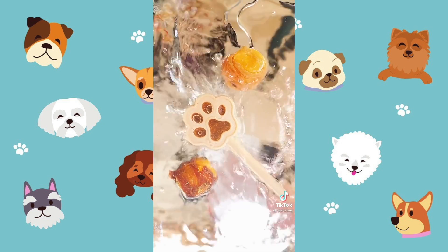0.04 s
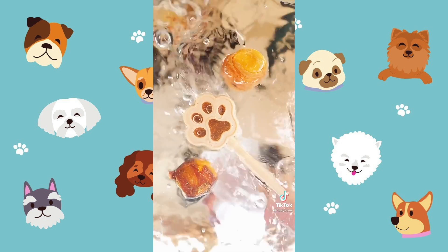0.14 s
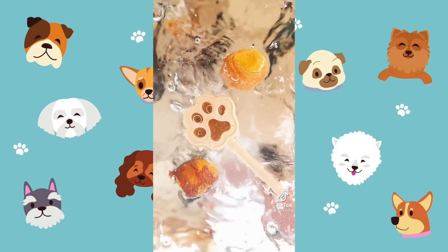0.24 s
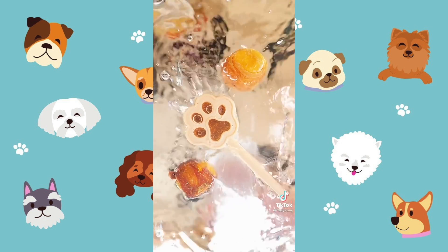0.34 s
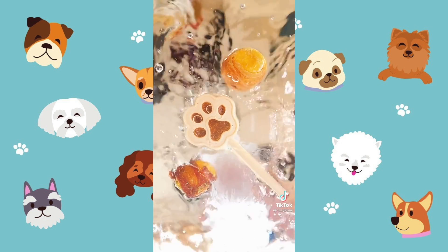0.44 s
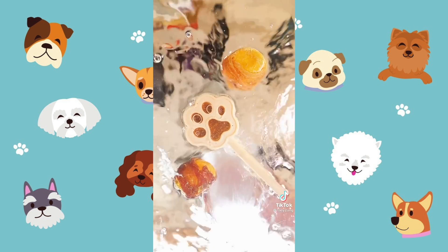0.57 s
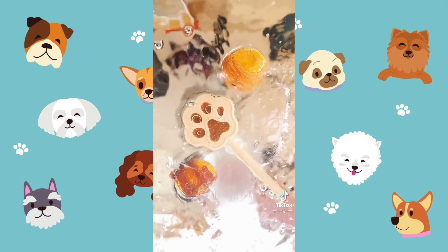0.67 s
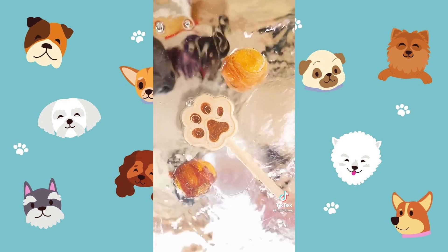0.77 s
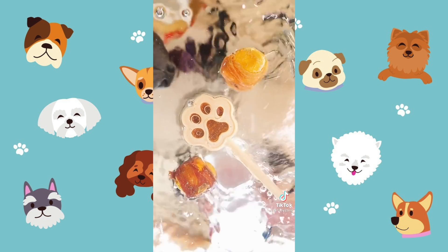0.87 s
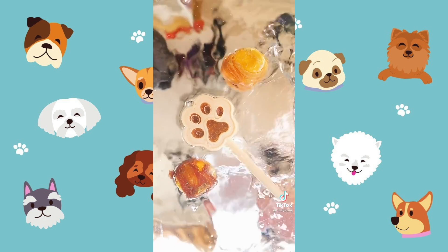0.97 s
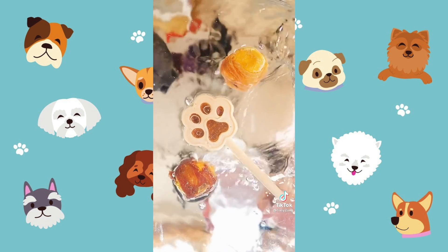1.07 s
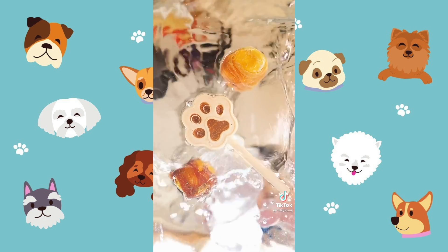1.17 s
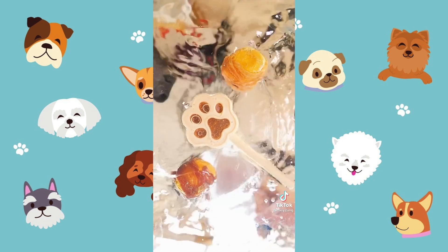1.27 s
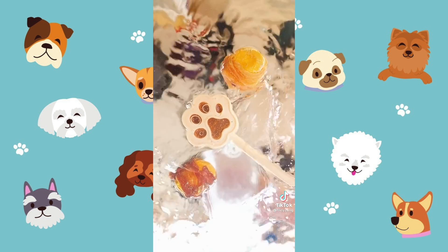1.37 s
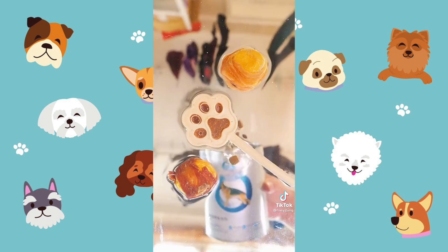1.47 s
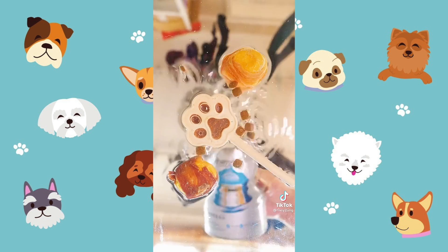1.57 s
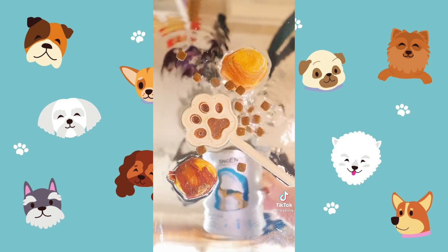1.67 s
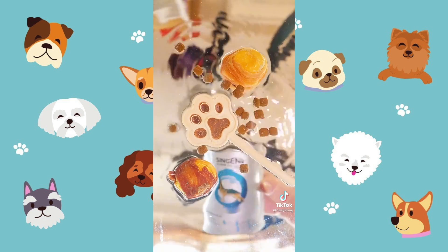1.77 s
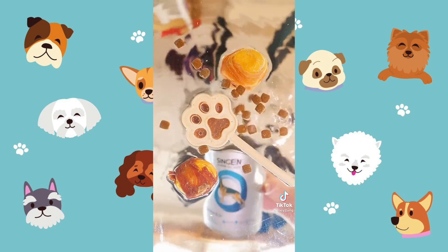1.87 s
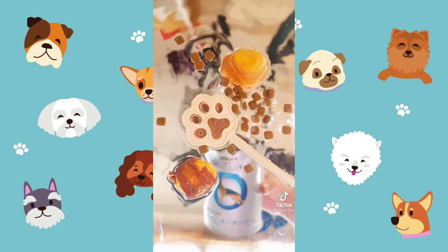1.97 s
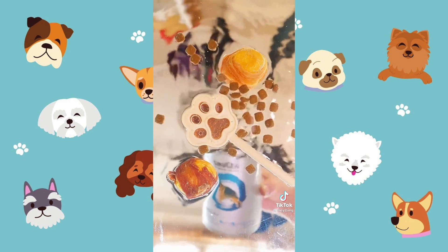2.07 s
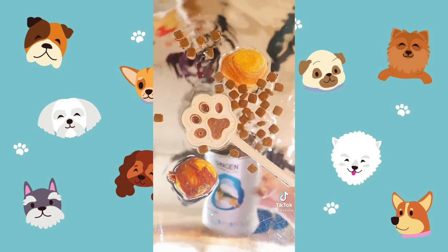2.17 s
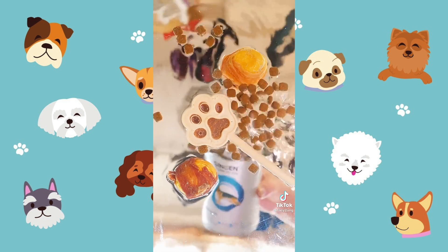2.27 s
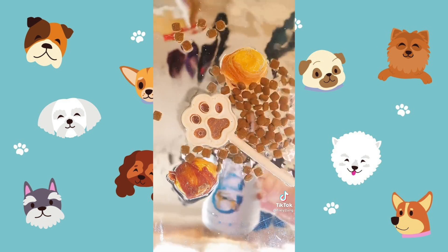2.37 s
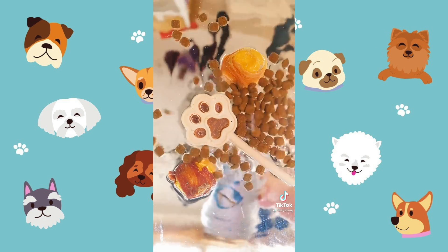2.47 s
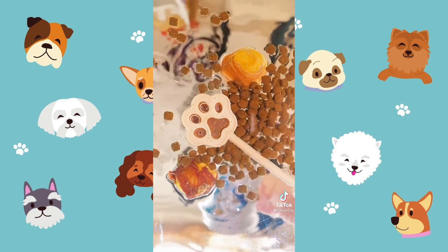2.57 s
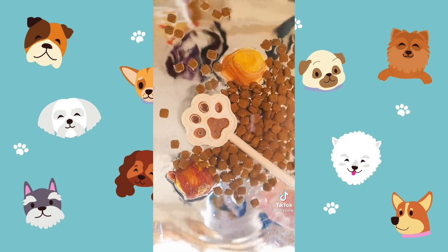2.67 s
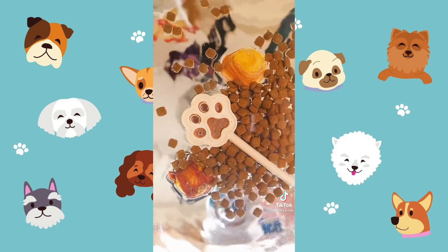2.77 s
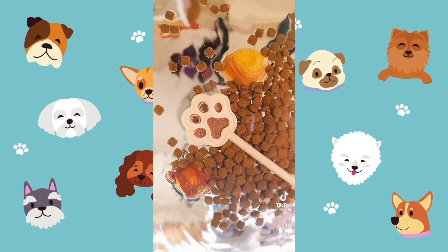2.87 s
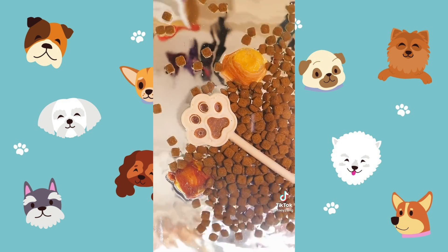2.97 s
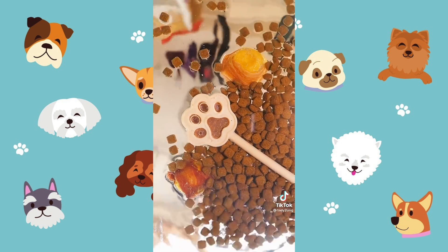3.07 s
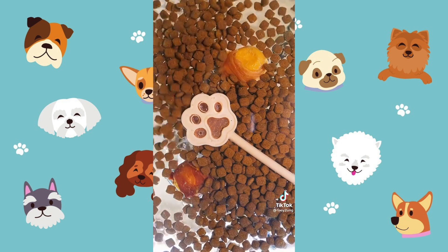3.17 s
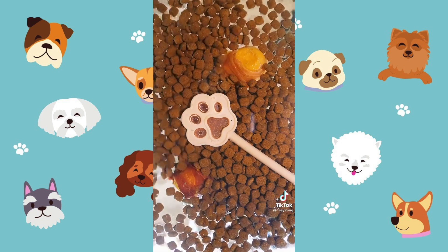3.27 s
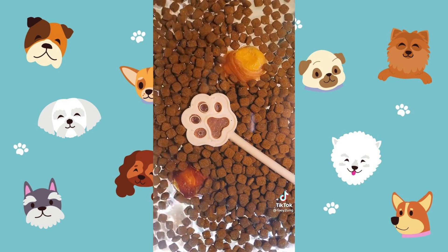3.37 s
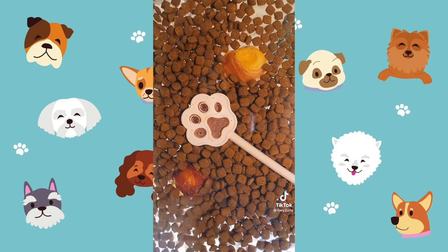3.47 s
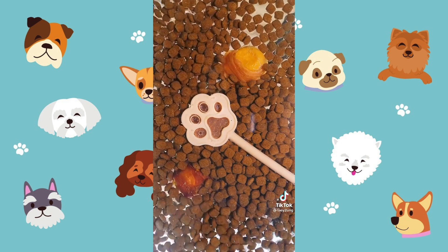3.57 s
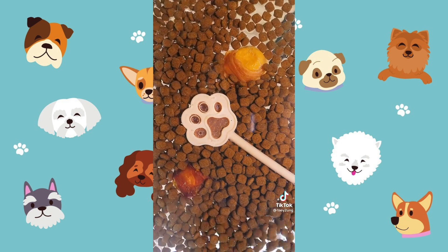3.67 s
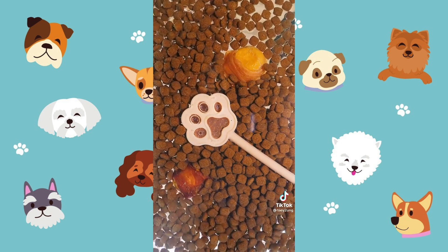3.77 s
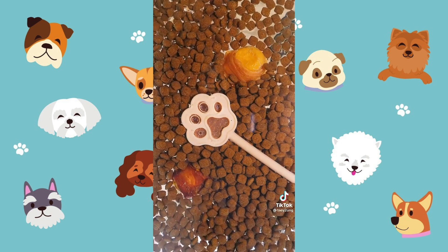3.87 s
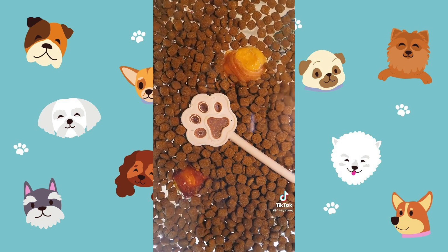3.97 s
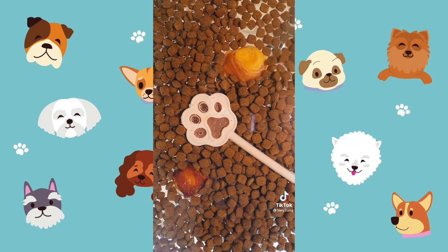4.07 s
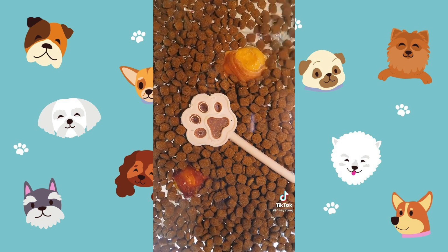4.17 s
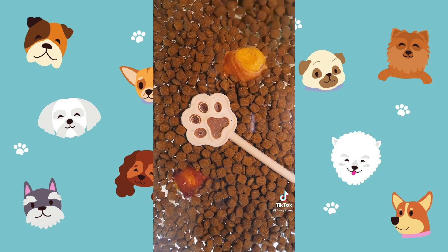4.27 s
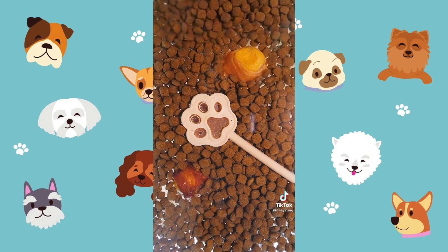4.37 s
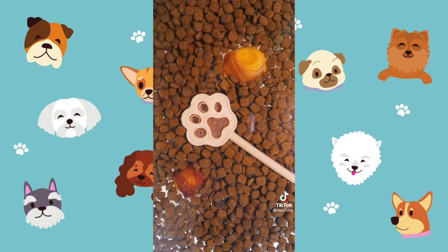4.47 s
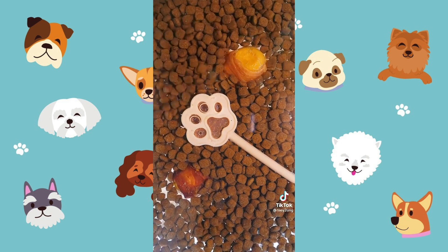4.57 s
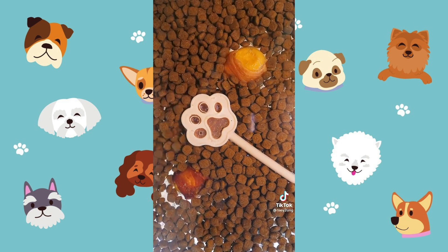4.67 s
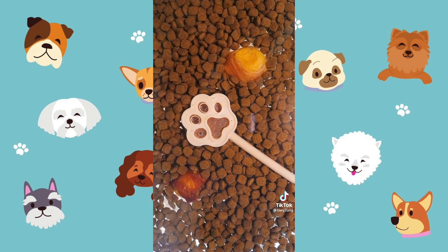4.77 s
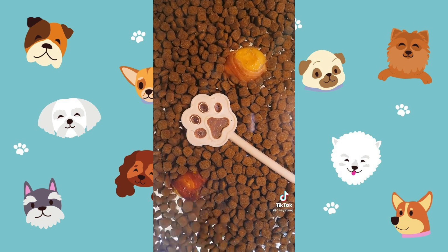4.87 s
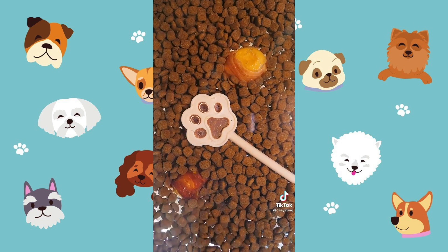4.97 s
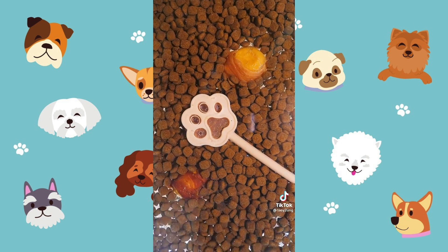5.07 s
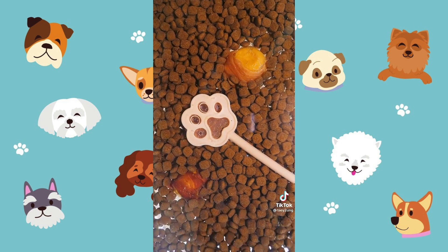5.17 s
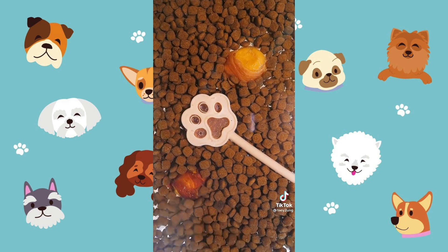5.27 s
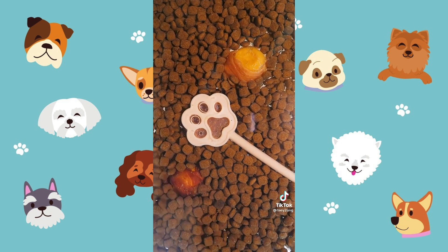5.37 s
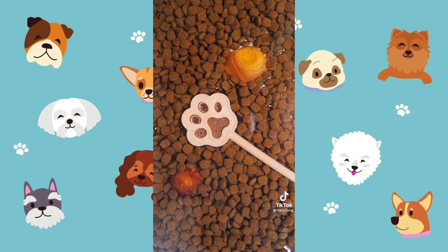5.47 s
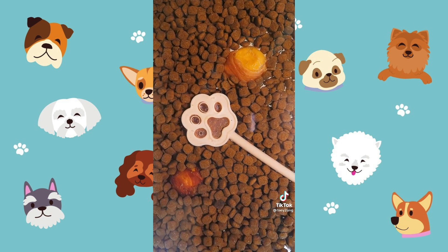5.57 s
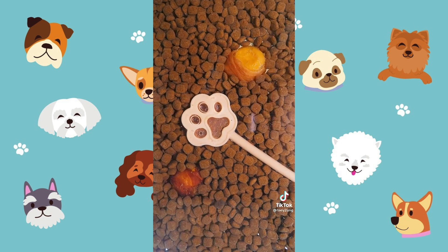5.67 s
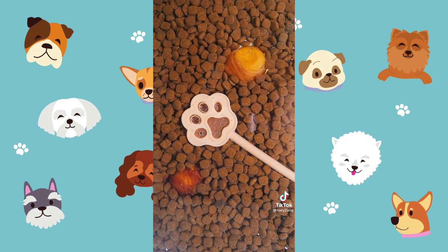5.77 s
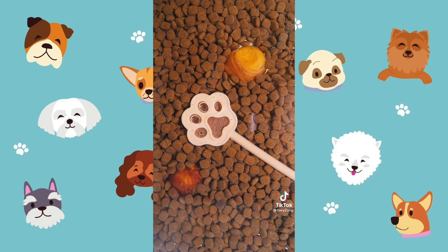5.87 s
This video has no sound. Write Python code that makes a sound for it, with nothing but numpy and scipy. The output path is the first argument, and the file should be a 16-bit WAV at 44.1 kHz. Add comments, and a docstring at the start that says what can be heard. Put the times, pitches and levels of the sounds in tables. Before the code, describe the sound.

A close, nearly mono microphone catches bright, brittle crackling of plastic sheet with a thin ring and soft hand bumps. Hard little pellets start hitting the floor of a plastic container, and the trickle opens into a steady clattering stream. It becomes drier and weaker as the box fills, swelling twice in sliding rushes. It stops suddenly, with slight crinkling over quiet air and a faint low hum.

```python
"""Crackling film and poured kibble

Thin plastic film, pulled taut, crackles close by: many short clicks that also make the sheet ring.
Then dry kibble drops into a clear plastic box: clicks and scrapes of pellets, with the walls ringing.
Single pellets knock on the bare floor, the pour thickens, and the growing heap muffles the walls.
Two late surges slide in with a hollow rumble; the pour is cut off, leaving a faint crinkle, a few
snaps and soft bumps, and a low hum in the quiet air."""
import sys
import numpy as np
from scipy import signal
from scipy.fft import rfft, irfft, next_fast_len
from scipy.io import wavfile
from scipy.ndimage import uniform_filter1d

SR = 44100
rng = np.random.default_rng(int(sys.argv[2]) if len(sys.argv) > 2 else 0)


def generate_wav(sig):
    """Save sig (samples, or channels by samples) to the path in sys.argv[1] as 16-bit PCM at SR."""
    pcm = np.round(np.clip(np.atleast_2d(sig).T, -1, 1) * 32767).astype(np.int16)
    wavfile.write(sys.argv[1], SR, pcm)


N = 261513  # length of the scene in samples

# All levels in the tables are relative: each layer is also scaled where it is mixed.
# quiet room noise, level at each frequency: (frequency [Hz], level [dB])
AIR_SPECTRUM = [(15, -36), (25, -14), (213, 0), (1120, -3.5), (1310, -2.5), (1960, -4), (2240, -9.5),
                (2630, -11.5), (3090, -21), (4870, -5), (7090, -21.5), (10600, -12), (15000, -8)]
# low rumble of the room: (frequency [Hz], level [dB])
LOW_AIR_SPECTRUM = [(20, -5), (35, -4), (50, -2.5), (80, -5), (135, 0.5), (200, -6.5), (300, -3.0),
                    (1000, -13.5), (4000, -81)]
# steady tones of the low hum after the pour: (frequency [Hz], level [dB])
HUM_TONES = [(70.0, -58), (113.0, -64), (156.1, -57.5)]
# the loudest creases of the film snapping: (time [s], level [dB], pitch [Hz])
SNAPS = [(0.029, -30, 3470), (0.0478, -12, 4410), (0.0797, -7.5, 5500), (0.0962, -18.5, 2010),
         (0.1665, -8, 3350), (0.1764, -11, 1815), (0.2059, -11, 2120), (0.2271, -17, 2260),
         (0.3127, -8, 4060), (0.3292, -8.5, 2940), (0.3393, -25, 2700), (0.3631, -11, 2740),
         (0.3892, -12, 5460), (0.412, -11, 9400), (0.4399, -4, 8360), (0.5013, -12, 3650),
         (0.5242, -10.5, 6200), (0.5342, -13.5, 3780), (0.5556, -2.5, 7100), (0.5781, -4, 7500),
         (0.606, -15, 2280), (0.6154, -10.5, 3800), (0.6604, -16, 3900), (0.6679, -10, 3970),
         (0.7048, -12, 4200), (0.7138, -15, 3020), (0.745, -8.5, 3450), (0.7572, -5, 3620),
         (0.7966, -4.5, 3690), (0.821, -15, 3780), (0.833, -10, 3620), (0.8619, -9.5, 3520),
         (0.8879, -9.5, 3600), (0.9248, -8, 3690), (0.9384, -14, 4700), (0.9542, -8, 2265),
         (0.9737, -9, 5120), (1.0301, -4.5, 5090), (1.0434, -14, 4850), (1.067, -10.5, 7100),
         (1.0954, -16.5, 2280), (1.1523, -4, 3610), (1.1737, -7, 3580), (1.2226, -4.5, 2980),
         (1.2334, -10, 2990), (1.2506, -3.5, 2880), (1.279, -5.5, 2240), (1.2857, -10, 2890),
         (1.2994, -7.5, 3540), (1.3178, -12, 7350), (1.3773, -16, 2570), (1.4401, -10.5, 6550),
         (5.7304, -14.5, 4770), (5.7656, -16, 4830), (5.7838, -10, 4800), (5.8236, -17.5, 3700)]
# ways the stretched film rings: (frequency [Hz], width [Hz], level [dB])
FILM_MODES = [(1308, 38, -4), (1870, 90, -38), (2255, 120, 1.5), (2460, 200, -21), (2830, 69, -16),
              (3675, 54, 1), (5210, 100, 0.5), (6200, 170, -2.5), (7450, 300, -1)]
# pulls on the film, each with a fine crinkle: (start [s], length [s], level [dB], pitch [Hz])
PULLS = [(0.0, 0.083, -30, 2580), (0.142, 0.074, -31.5, 2300), (0.285, 0.1, -35.5, 2930),
         (0.574, .28, -38.5, 3780), (0.884, 0.26, -34, 2670), (1.148, 0.15, -31.5, 3190),
         (5.79, 0.16, -41, 3240)]
# soft bumps of the hand on the box: (time [s], level [dB], pitch [Hz])
BUMPS = [(0.167, -21, 585), (0.176, -24.5, 840), (0.201, -22, 1040), (0.407, -31, 620), (0.73, -20, 616),
         (0.79, -28.5, 606), (5.716, -34, 930), (5.742, -32, 1020), (5.761, -29, 900), (5.822, -24.5, 920)]
# strength of the stream of kibble: (time [s], level [dB])
FLOW = [(2.3, -22.5), (2.44, -21.5), (2.84, -21.5), (3.12, -27), (3.4, -26.5), (3.53, -26), (3.77, -31),
        (3.88, -34.5), (4.06, -33), (4.23, -29.5), (4.44, -27), (4.77, -30.5), (5.03, -30.5), (5.17, -34),
        (5.36, -26.5), (5.48, -31.5), (5.63, -31)]
# share of the stream that drums on the walls: (time [s], level [dB])
WALL_SHARE = [(2.3, -5), (2.95, -5.5), (3.25, 2), (3.5, -9), (4.35, -10.5), (4.7, -3), (5.1, -8.5),
              (5.6, -2.5)]
# the heap slides and shakes the loaded box: (crest [s], rumble [dB], rise [s], fall [s])
SURGES = [(4.272, -27, 0.28, 0.13), (5.298, -20, 0.14, 0.12)]
# moments when the stream falters: time [s]
STALLS = [1.83, 2.07, 3.942, 3.993, 4.975, 5.056]
# tone colour of pellets rattling on each other: (frequency [Hz], level [dB])
RATTLE_SPECTRUM = [(300, -40), (1000, -1.5), (2000, -6), (3000, -3), (5000, 1.5), (7000, 0.5), (10000, 5),
                   (15000, 12)]
# tone colour of pellets sliding: (frequency [Hz], level [dB])
SLIDE_SPECTRUM = [(1500, -33), (4000, -20.5), (8000, -2.5), (11000, -2), (13000, -1.5), (16000, 5)]
# ways the box rings: (frequency [Hz], width [Hz], level [dB])
BOX_MODES = [(487, 44, -19.5), (689, 91, -8), (785, 350, -14), (1272.5, 42, -9.5), (1336.7, 15, -6),
             (1811, 65, -5.5), (2154, 58, -20.5), (2160, 70, 1), (2986, 79, -1), (3486, 44, -5.5),
             (3786, 39, -4.5), (4820, 84, 2), (4980, 400, -1.5), (5200, 66, -34), (5750, 91, -4),
             (7230, 67, -12.5), (8030, 390, -7.5)]
# ways the floor rings until pellets cover it: (frequency [Hz], width [Hz], level [dB])
BARE_FLOOR_MODES = [(2998, 31, 1.5), (5010, 90, -7), (5450, 120, -2), (6120, 200, -2)]
# ways the walls ring when damped by the load: (frequency [Hz], width [Hz], level [dB])
HALF_FULL_MODES = [(686, 215, -11), (1319, 60, -6), (2084, 130, -2), (2990, 95, -3.5), (3750, 340, -5.5),
                   (4690, 160, -4.5), (6020, 470, -5)]
# low ways the filled box rings: (frequency [Hz], width [Hz], level [dB])
LOADED_MODES = [(483, 72, 3.5), (502, 83, -0.5), (577, 31, 2.5), (680, 540, -10.5)]
# pellets landing hard: (time [s], click [dB], knock on the box [dB])
LANDINGS = [(1.488, -3.5, -18), (1.5022, -3, -17.5), (1.5392, -3.5, -14), (1.5544, -8, -20.5),
            (1.5749, -1.5, -20.5), (1.5954, -2.5, -16.5), (1.6332, -14.5, -25), (1.6418, -12.5, -21.5),
            (1.6614, -4.5, -16.5), (1.6952, -2.5, -17), (1.7064, -9, -31), (1.73, -5.5, -24.5),
            (1.7439, -4, -23), (1.7596, -4, -20), (1.769, -2, -21), (1.796, -13, -46), (1.8538, -12.5, -19),
            (1.872, -21, -35.5), (1.9084, -9, -26), (1.9144, -2.5, -33.5), (1.947, -7, -19.5),
            (1.966, -6.5, -20.5), (1.981, -3.5, -27.5), (1.9884, -6, -26.5), (2.0164, -14.5, -33),
            (2.0278, 0, -18.5), (2.0473, -10, -23.5), (2.0854, -6, -26), (2.1012, -4.5, -18.5),
            (2.1117, -3.5, -21), (2.1293, -4.5, -21.5), (2.1535, -1.5, -21), (2.1584, -3.5, -15),
            (2.1792, -7.5, -20), (2.204, -2.5, -16.5), (2.2444, -4.5, -18), (2.2787, -3, -16.5),
            (2.3087, -2.5, -19.5), (2.3556, -3, -23), (2.4238, -2, -20.5), (2.4698, -3, -20),
            (2.7488, -3, -21), (2.8934, -4, -19.5), (2.9053, 0.5, -17.5), (3.3254, -6.5, -17.5),
            (3.3764, -7, -23), (3.4453, -7, -23.5)]
# pellets clicking on the heap: (time [s], level [dB], pitch [Hz])
TICKS = [(3.8616, -10, 5540), (3.8826, -13, 5530), (3.9054, -5.5, 5400), (3.9653, -1, 5600),
         (4.0276, 1, 10550), (4.0644, -5, 4550), (4.0978, -4.5, 4800), (4.115, -3, 5460), (4.129, -6, 6070),
         (4.154, -1, 3500), (4.2028, -18, 6200), (4.2607, -11, 4773), (4.6418, -2, 6300),
         (4.7867, -5, 4960), (4.8129, -0.5, 6250), (4.8227, 0, 5750), (4.8493, -5, 5990),
         (4.9851, -12, 11800), (5.007, -16, 4270), (5.0744, -11, 4300), (5.1733, -2.5, 10400),
         (5.2056, -8.5, 2970), (5.3892, -2.5, 9700), (5.4056, -7, 5800), (5.461, -8.5, 4030),
         (5.5508, -8, 3990)]
# how long the room's echo takes to fade by 60 dB: (frequency [Hz], time [s])
ROOM_FADE = [(200, 0.91), (2000, 0.22), (12000, 0.014)]
# the microphone's loss of treble: (frequency [Hz], level [dB])
MIC_TREBLE = [(9000, -0.5), (12000, -3.0), (14000, -9.0), (16000, -20.0)]

POUR_START, POUR_END = 1.485, 5.644  # s
TOP_HZ = 15900  # highest pitch of a click, and band limit of the microphone
PULL_ATTACK_S, PULL_RELEASE_DB_PER_S = 0.011, 244  # a pull takes hold, then lets go
SLACK_DB = -47.5  # effort between pulls
TAUT_START, TAUT_END = 0.64, 1.5  # s, the film is fully stretched
TRICKLE_DB, OPEN_S, OPEN_RISE_S = -21.5, 2.299, 0.15  # only a trickle falls until the stream opens up
STALL_S, STALL_DB = 0.016, -21.5  # width to each side and depth of a stall
SLIDE_LAG_S, SLIDE_RISE_S, SLIDE_FALL_S = 0.04, 0.12, 0.13  # the slide crests just after the rumble
HISS_DB = -8.5  # hiss against the flow
SURGE_HISS_DB, SURGE_RATTLE_DB = 12.5, 5.5  # gains in a surge
CLATTER_S, CLATTER_WIDTH_S, CLATTER_DB = 3.45, 0.11, 5  # harder clatter as the walls become covered
LOADED_S, LOADED_DB = 3.85, -11.5  # start of the box's rumble, and its level against the flow
PELLET_HZ = 5070  # pitch of a square hit
GLANCE_OCT_PER_DB = 0.11  # rise in pitch as the hit glances
SQUARE_HIT_DB = 13  # click over knock in a square hit


def amp(db):
    """Turn decibels into a gain."""
    return 10 ** (np.asarray(db) / 20)


def unit(x):
    """Scale to an average strength (rms) of 1."""
    return x / np.sqrt(np.mean(x ** 2) + 1e-20)


def even(x, size=3500):
    """Level out the strength over short stretches to about 1, keeping the single grains."""
    power = uniform_filter1d(uniform_filter1d(unit(x) ** 2, size), size)
    return unit(x) / np.sqrt(np.abs(power) + 1e-4)


def along(points, hz):
    """Read a curve of (frequency, value) points on a log frequency axis."""
    f, v = np.transpose(points)
    return np.interp(np.log(hz + 1), np.log(f + 1), v)


def gains(rows):
    """Give one gain per sample for each dB column after the time."""
    s, *columns = np.transpose(rows)
    return [amp(np.interp(np.arange(N) / SR, s, column)) for column in columns]


def during(start, end):
    """Give 1 between two times, with short ramps."""
    t = np.arange(N) / SR
    return uniform_filter1d(((t >= start) & (t < end)) * 1., size=100)


def swell(s, rise_s, fall_s):
    """A smooth hump from 0 to 1 and back, with its crest at s."""
    t = np.arange(N) / SR - s
    return np.exp(-(t / np.where(t < 0, rise_s, fall_s)) ** 2)


def filtered(x, response):
    """Scale each frequency of x by the given response."""
    m = next_fast_len(N + 8192)  # spare room, so the end does not wrap round to the start
    return irfft(rfft(x, m) * response(np.fft.rfftfreq(m, 1 / SR)), m)[..., :N]


def coloured(x, spectrum):
    """Pass x through a curve of (frequency, dB) points."""
    return filtered(x, lambda hz: amp(along(spectrum, hz)))


def add(track, s, sound):
    """Mix a sound into the track at a time."""
    part = track[max(round(s * SR), 0):][:len(sound)]
    part += sound[:len(part)]


def ring(modes, times, sizes, vary_db=4.0):
    """Blows on a body: each lands elsewhere, so it meets each mode (way of ringing) at a new strength."""
    t, out = np.arange(SR // 8) / SR, np.zeros(N)
    at = np.clip(np.round(times * SR).astype(int), 0, N - 1)
    for hz, width_hz, db in modes:
        z = rng.standard_normal((len(at), 2))
        blows = np.bincount(at, sizes * np.sign(z[:, 0]) * amp(vary_db * z[:, 1]), N)
        build_up = 1 - np.exp(-t * hz / 2.0)  # a mode takes a cycle or two to build up
        fade = np.exp(-np.pi * width_hz * t)  # a wider mode fades faster
        mode = np.sin(2 * np.pi * hz * t) * fade * build_up
        out += signal.oaconvolve(blows, amp(db) * mode / np.linalg.norm(mode))[:N]
    return out


def click(hz, spread, t60, crack, crack_t60, rise=0.001, count=9):
    """A small stiff thing struck: a sharp crack and a few short modes around its pitch; peak 1."""
    t = np.arange(SR // 25) / SR
    z = rng.standard_normal((count, 3))
    place = np.linspace(-1, 1, count)
    offset = spread * place * (np.abs(place) + 0.31 + 0.24 * z[:, 0])
    pitch = np.minimum(hz * np.exp(offset), TOP_HZ)[:, None]
    weight = amp(-12 * np.abs(place) + 9.0 * z[:, 1]) * np.sign(z[:, 2])
    slow = np.sqrt(4000 / pitch)  # lower modes swell later and last longer
    fade = amp(-60 * t / (t60 * slow))
    build_up = 1 - np.exp(-t / (rise * slow))
    tone = weight @ (np.sin(2 * np.pi * pitch * t) * fade * build_up)
    noise = rng.standard_normal(len(t)) * amp(-60 * t / crack_t60)
    burst = signal.lfilter(*signal.butter(2, [3200, 13000], "band", fs=SR), noise)
    sound = tone / np.abs(tone).max() + crack * burst / np.abs(burst).max()
    return sound / np.abs(sound).max()


def contacts(start, end, count, spread_db):
    """Random times and sizes of many small contacts."""
    times = rng.uniform(start, end, count)
    return times, amp(spread_db * np.minimum(rng.standard_normal(count), 2))


def grains(times, sizes, hz, spread, cycles, size=300):
    """Each contact rings for a few cycles at its own pitch, scattered around hz."""
    z = rng.standard_normal((len(times), 2))
    ratio = np.exp(spread * z[:, :1])
    turns = np.minimum(np.reshape(hz, (-1, 1)) * ratio, SR / 2) * np.arange(size) / SR
    waves = np.sin(2 * np.pi * turns) * np.exp(-turns / cycles) * (1 - np.exp(-2 * turns))
    waves *= sizes[:, None] * np.sign(z[:, 1:]) * np.sqrt(ratio)
    at = (times * SR).astype(int)[:, None] + np.arange(size)
    return np.bincount(at.ravel(), waves.ravel(), N)[:N]


def air():
    """Quiet room noise, a little stronger before the pour, and a low hum after it."""
    t = np.arange(N) / SR
    before = during(0, POUR_START)
    hiss_level = amp(-46.5) + amp(-58.5) * before
    hiss = hiss_level * unit(coloured(rng.standard_normal(N), AIR_SPECTRUM))
    low_level = amp(-55.0) + amp(-66.0) * before
    low = low_level * unit(coloured(rng.standard_normal(N), LOW_AIR_SPECTRUM))
    hum = np.zeros(N)
    for hz, db in HUM_TONES:
        hum += amp(db) * np.sqrt(2) * np.sin(2 * np.pi * hz * t + rng.uniform(0, 2 * np.pi))
    return hiss + low + amp(3.5) * hum * during(POUR_END, N / SR)


def pulling():
    """How hard the film is worked: each pull takes hold, lasts and lets go."""
    t = np.arange(N) / SR
    effort = amp(SLACK_DB) * (during(0, POUR_START) + amp(-9.0) * during(POUR_END, N / SR))
    for s, length, db, _ in PULLS:
        hold = np.clip((t - s) / PULL_ATTACK_S, 0, 1)
        release_db = PULL_RELEASE_DB_PER_S * np.maximum(t - s - length, 0)
        effort = np.maximum(effort, hold * amp(db - release_db))
    return effort


def crinkle(count, spread_db, spread, cycles, octaves=0):
    """Tiny creases give way; their pitch moves with the tension of the film, finer ones octaves higher."""
    s, length, _, hz = np.transpose(PULLS)
    times, sizes = contacts(0, N / SR, count, spread_db)
    pitch = np.interp(times, s + length / 2, hz) * 2 ** octaves
    return pulling() * even(grains(times, sizes, pitch, spread, cycles))


def film():
    """Creases snap at their own pitches; those before the pour wake the nearest modes of the sheet."""
    out = np.zeros(N)
    for s, db, hz in SNAPS:
        snap = click(hz, spread=0.327, t60=0.015, crack=0.92 * hz / 4500, crack_t60=0.014,
                     rise=0.001 * (3500 / hz) ** 2)  # a higher snap is sharper
        add(out, s, amp(db - 5.0) * snap)
    s, db, hz = np.transpose(SNAPS)
    tautness = np.interp(s, [.3, .55], [.4, 1])  # the sheet rings more once it is taut
    force = amp(db) * tautness * (s < POUR_START)
    for mode in FILM_MODES:
        nearness = 1 / (1 + (np.log(hz / mode[0]) / 0.24) ** 2)
        out += amp(5.0) * ring([mode], s, force * nearness)
    out += amp(-7.0) * crinkle(count=6000, spread_db=6.5, spread=0.242, cycles=3.6)
    out += amp(-4.0) * crinkle(count=1200, spread_db=5.5, spread=0.39, cycles=1.05, octaves=1.0)
    # tiny creases keep the taut sheet ringing
    sheet = even(ring(FILM_MODES, *contacts(TAUT_START, TAUT_END, count=190, spread_db=8.0)))
    return out + amp(-4.5) * pulling() * sheet


def small_snaps():
    """While the film is pulled, lesser creases snap at random, somewhere near the pitch of that pull."""
    out, effort = np.zeros(N), pulling()
    start, length, _, pitch = np.transpose(PULLS)
    for s, size in zip(*contacts(0, TAUT_END, count=150, spread_db=4.)):
        hz = np.interp(s, start + length / 2, pitch) * np.exp(rng.normal(0.204, .2))
        level = amp(8.5) * size * effort[int(s * SR)]
        add(out, s, level * click(hz, spread=0.234, t60=0.013, crack=0.59, crack_t60=0.0082))
    return out


def bumps():
    """The hand bumps the box: soft, low knocks that hardly ring."""
    out = np.zeros(N)
    for s, db, hz in BUMPS:
        knock = click(hz, spread=0.455, t60=0.0059, crack=.02, crack_t60=.004, rise=0.00095)
        add(out, s, amp(db) * knock)
    return out


def stream():
    """The flow drives rattle, hiss, drumming and rumble; a sliding heap swells rattle, hiss and rumble."""
    t = np.arange(N) / SR
    trickle_db = TRICKLE_DB * np.clip((OPEN_S - t) / OPEN_RISE_S, 0, 1)
    stall_db = STALL_DB * sum(swell(s, STALL_S, STALL_S) for s in STALLS)
    flow = gains(FLOW)[0] * amp(2.5 + trickle_db + stall_db)
    sliding = sum(swell(row[0] + SLIDE_LAG_S, SLIDE_RISE_S, SLIDE_FALL_S) for row in SURGES)
    shaking = sum(amp(db) * swell(s, rise, fall) for s, db, rise, fall in SURGES)
    clatter_db = CLATTER_DB * swell(CLATTER_S, CLATTER_WIDTH_S, CLATTER_WIDTH_S)
    rattle = flow * amp(SURGE_RATTLE_DB * sliding + clatter_db)
    hiss = flow * amp(HISS_DB + SURGE_HISS_DB * sliding)
    drum = flow * gains(WALL_SHARE)[0]
    rumble = np.hypot(shaking, amp(LOADED_DB) * flow * during(LOADED_S, POUR_END))
    return rattle, hiss, drum, rumble


def chatter(times, sizes, span, count=3):
    """Each tumbling pellet touches several times within a short span (s)."""
    delays = np.cumsum(rng.uniform(0, span, (len(times), count)), axis=1) / count
    return (times[:, None] + delays).ravel(), np.repeat(sizes, count)


def pour():
    """Hundreds of pellets a second click on each other and drum on the box, while others slide."""
    rattle, hiss, drum, rumble = stream()
    times, sizes = chatter(*contacts(POUR_START, POUR_END, count=1600, spread_db=2.0), span=.006)
    sizes = sizes ** np.interp(times, [2.2, 3.4, 4.3], [1, .9, .75])  # the heap cushions the hardest hits
    # pellets on each other, and pellets on bare plastic
    pellets = coloured(grains(times, sizes, hz=4400, spread=0.4, cycles=1.48), RATTLE_SPECTRUM)
    bright_modes = [mode for mode in BOX_MODES if mode[0] > 2500]
    bright = even(ring(bright_modes, times, sizes))
    bare = np.interp(np.arange(N) / SR, [2.85, 3.2], [.55, .05])  # share of hits on bare plastic
    out = amp(-2.5) * rattle * (np.sqrt(1 - bare) * even(pellets) + np.sqrt(bare) * bright)
    # sharp edges and short scrapes make the hiss
    edges = unit(grains(times, sizes, hz=9470, spread=0.43, cycles=6.2))
    scrape_contacts = contacts(POUR_START, POUR_END, count=7000, spread_db=-6.5)  # a few far louder
    scrapes = unit(grains(*scrape_contacts, hz=10300, spread=0.34, cycles=0.51))
    out += amp(1.5) * hiss * even(coloured(edges + scrapes, SLIDE_SPECTRUM))
    # as the box fills, the drumming moves to the damped walls
    fill = np.interp(times, [2.85, 3.25], [0, 1])
    walls = ring(BOX_MODES, times, sizes * (1 - fill)) + ring(HALF_FULL_MODES, times, sizes * fill)
    out += amp(1.0) * drum * even(walls)
    shakes = contacts(3.5, POUR_END, count=900, spread_db=0.5)
    out += amp(-5.5) * rumble * even(ring(LOADED_MODES, *shakes))
    return out * during(POUR_START, POUR_END)


def landings():
    """A pellet hits with one edge, tips onto another just after and sets the box ringing."""
    out = np.zeros(N)
    for s, db, knock_db in LANDINGS:
        hz = PELLET_HZ * 2 ** (GLANCE_OCT_PER_DB * (db - knock_db - SQUARE_HIT_DB))
        crack = .5 * (hz / 5000) ** 2  # a sharper edge gives a brighter contact
        first = click(hz, spread=0.309, t60=0.015, crack=crack, crack_t60=0.03, rise=0.00016)
        add(out, s, amp(db - 2.5) * first)
        second = click(hz, spread=0.242, t60=0.019, crack=crack, crack_t60=0.0053)
        add(out, s + rng.uniform(0.00093, 0.022), amp(db - 10.5) * second)
    s, _, knock_db = np.transpose(LANDINGS)
    uncovered = np.interp(s, [1.55, 2.3], [1, 0])  # share of the floor still bare
    box = amp(14.5) * ring(BOX_MODES, s, amp(knock_db))
    bare_floor = amp(19.) * ring(BARE_FLOOR_MODES, s, amp(knock_db) * uncovered)
    return out + box + bare_floor


def strays():
    """A few pellets of the stream fall edge first and click above the rest."""
    out, rattle = np.zeros(N), stream()[0]
    for s, size in zip(*contacts(OPEN_S, POUR_END, count=110, spread_db=2.5)):
        hz = PELLET_HZ * np.exp(rng.normal(0, 0.282))
        level = amp(10.0) * size * rattle[int(s * SR)]
        add(out, s, level * click(hz, spread=0.47, t60=0.0041, crack=1.0, crack_t60=0.0085, rise=0.00011))
    return out


def ticks():
    """On the heap a pellet gives a dry click, and little reaches the walls."""
    out = np.zeros(N)
    for s, db, hz in TICKS:
        tick = click(hz, spread=0.641, t60=0.007, crack=0.83, crack_t60=0.013, rise=0.00033)
        add(out, s, amp(db - 2.0) * tick)
    s, db, _ = np.transpose(TICKS)
    return out + amp(-12.5) * ring(BOX_MODES, s, amp(db))


def room(x):
    """A small room: each frequency of its echo dies at its own speed."""
    hz, t, z = signal.stft(rng.standard_normal(SR // 3), SR, nperseg=256)
    fade = amp(-60 * t / along(ROOM_FADE, hz)[:, None])
    tail = signal.istft(z * fade, SR, nperseg=256)[1]
    return signal.fftconvolve(x, tail / np.linalg.norm(tail))[:N]


def scene():
    """Everything is close and in the middle; small light things give off little bass."""
    small = film() + small_snaps() + pour() + landings() + strays() + ticks()
    bass_cut = signal.butter(2, 290, "high", fs=SR, output="sos")
    close = signal.sosfilt(bass_cut, small) + bumps()
    mid = close + amp(-18.) * room(close) + air()
    scatter = rng.standard_normal(64)  # the two channels differ by a trace
    side = amp(-57.5) * np.convolve(mid, scatter / np.linalg.norm(scatter))[:N]
    return np.array([mid + side, mid - side])


def record(dry):
    """The microphone rolls off the highest treble, rounds off full-scale peaks and ends at its band limit."""
    x = coloured(dry, MIC_TREBLE)
    x = x / (1 + np.abs(x) ** 6) ** (1 / 6)
    return filtered(x, lambda hz: hz < TOP_HZ)


dry = scene()
out = record(dry)
generate_wav(out)
```